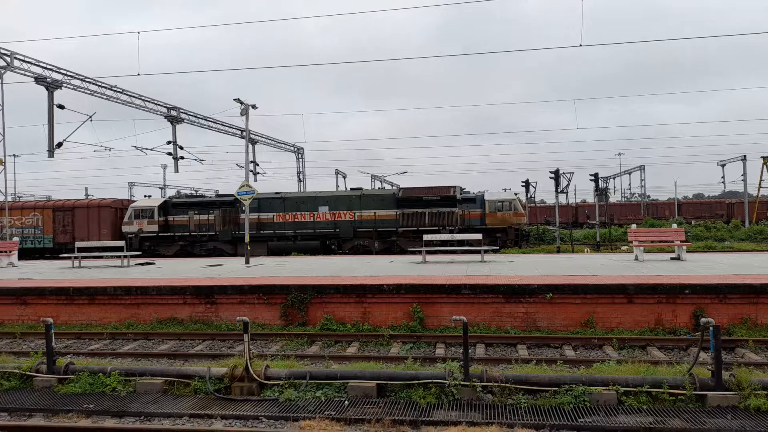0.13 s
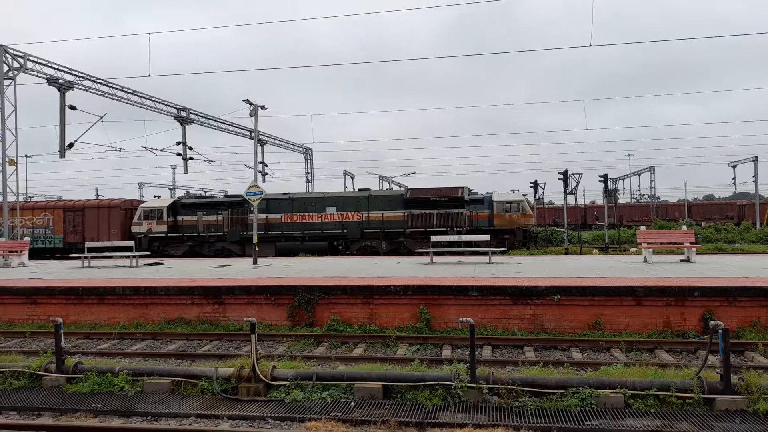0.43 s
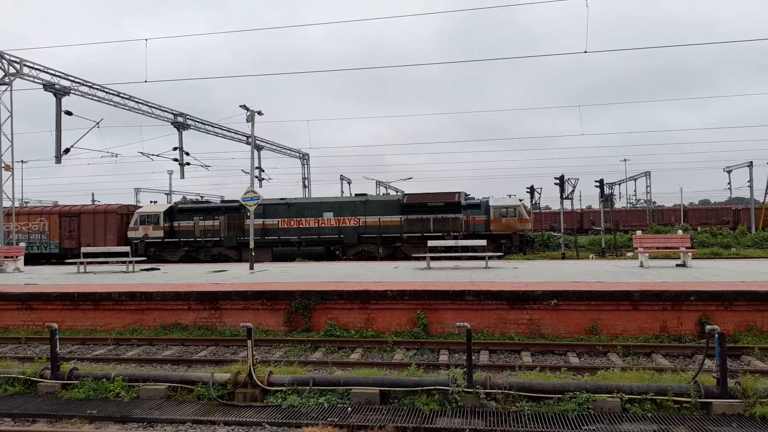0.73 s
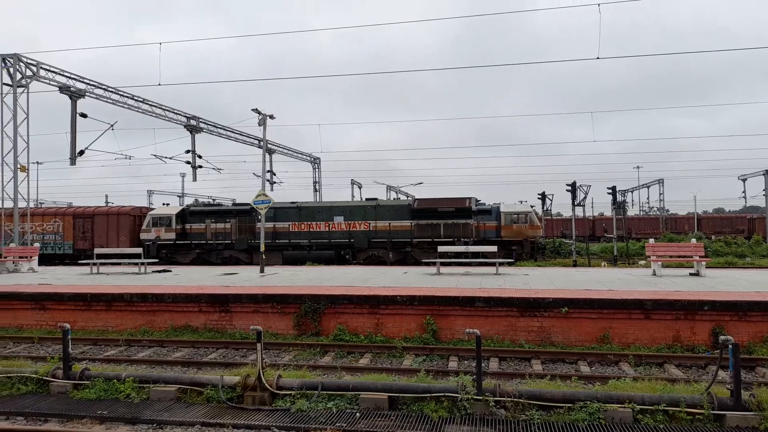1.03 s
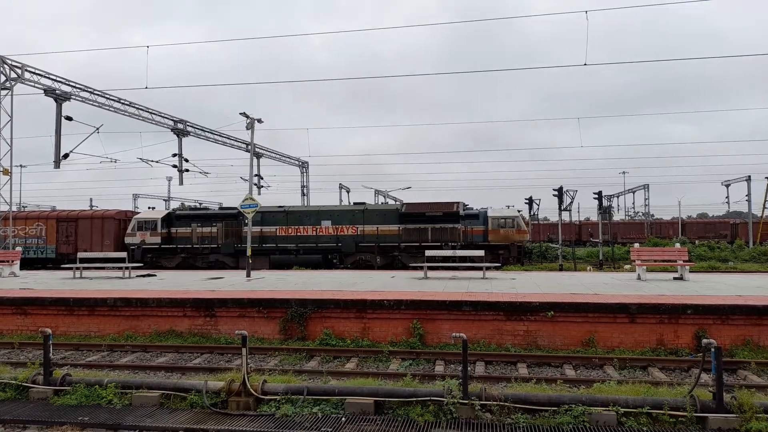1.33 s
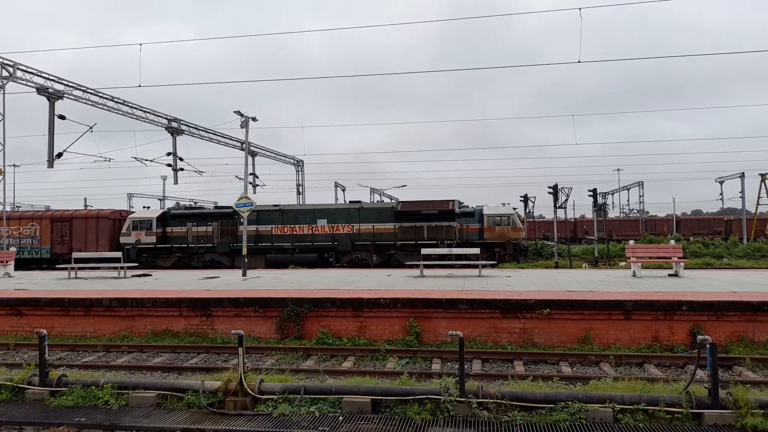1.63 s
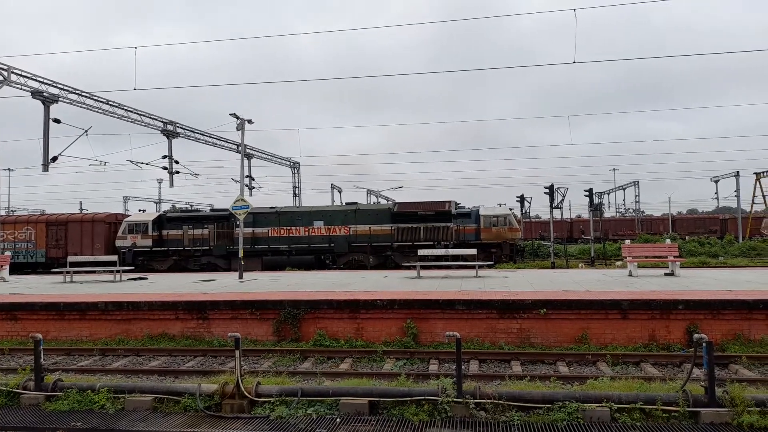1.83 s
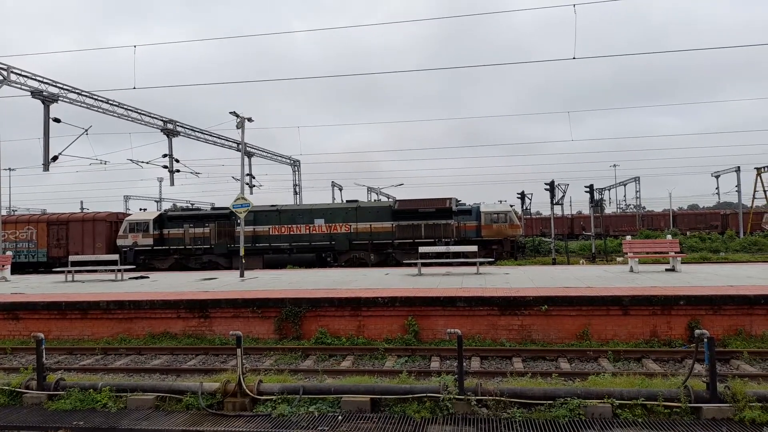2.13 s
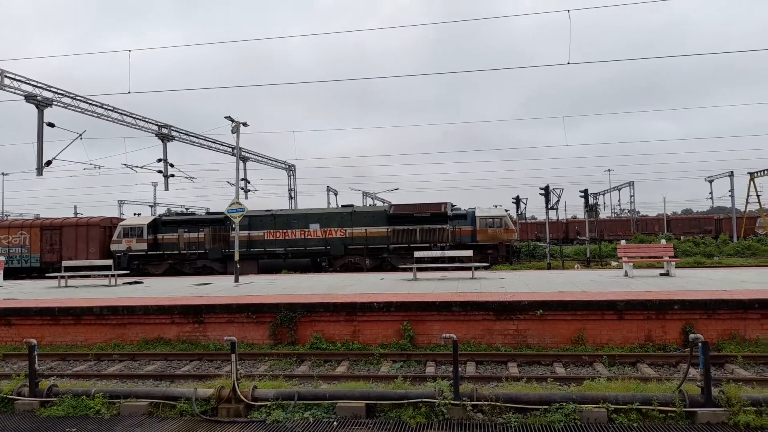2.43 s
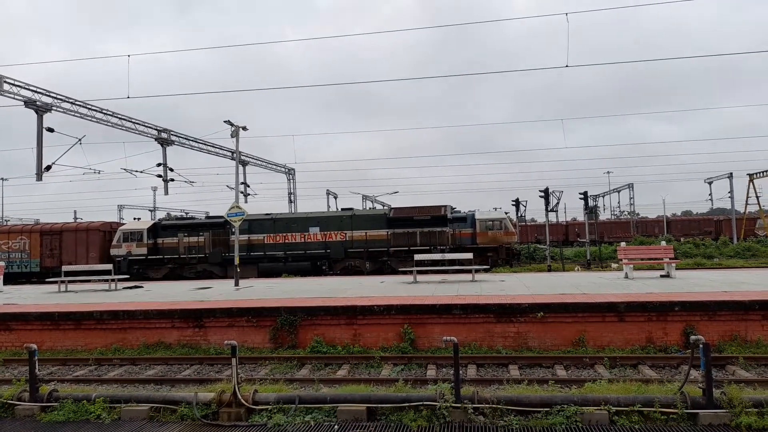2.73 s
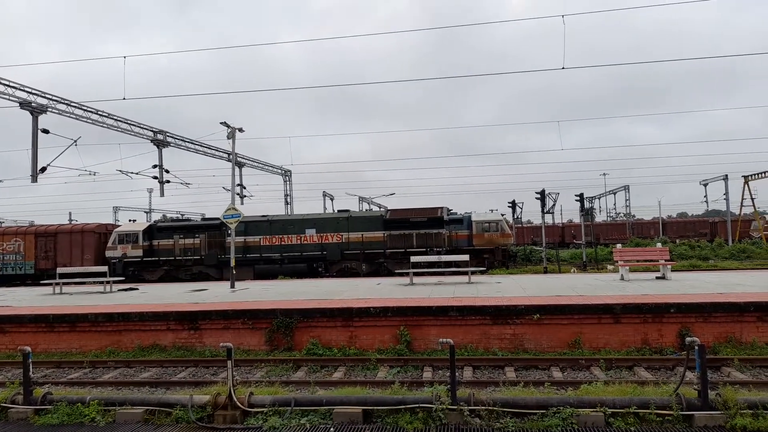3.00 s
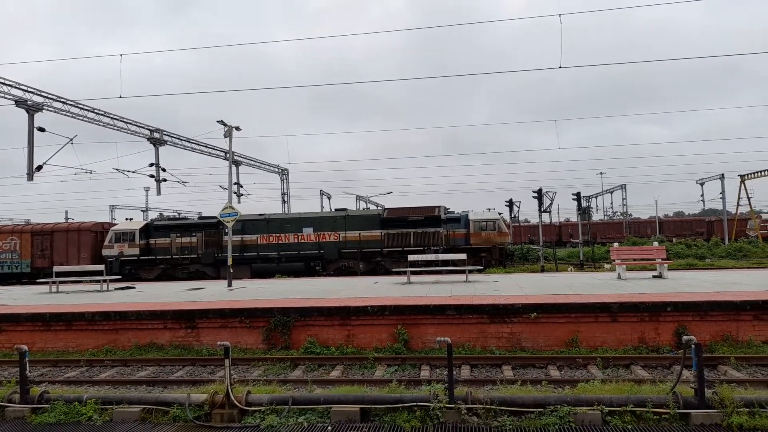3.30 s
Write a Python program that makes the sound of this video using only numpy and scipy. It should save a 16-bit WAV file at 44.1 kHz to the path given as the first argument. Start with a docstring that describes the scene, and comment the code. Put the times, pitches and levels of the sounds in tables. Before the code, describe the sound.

A diesel locomotive idles throughout, its deep, even throb mixed with mechanical clatter, rushing air and a thin, wavering whistle. It is heard from across the tracks at an open-air station, with brief distant tones near the start and end.

```python
"""Idling diesel locomotive

A big two-stroke diesel idles across the tracks of an open-air station. Each turn of its crank brings
an exhaust throb, a hollow boom and the same clatter of valves and injectors. Gas and cooling air roar,
gears whine and the turbocharger whistles. Faint rustles, ticks and distant tones come and go."""
import sys
import numpy as np
from scipy import signal
from scipy.fft import rfft, irfft
from scipy.io import wavfile

SR = 44100
rng = np.random.default_rng(int(sys.argv[2]) if len(sys.argv) > 2 else 0)


def digitize_waveform(pressure):
    """Quantize a signal to 16-bit integers and store it at the path in sys.argv[1].

    Rows of a 2-D input are taken as channels; values are limited to [-1, 1].
    """
    field = np.atleast_2d(pressure).T
    bounded = np.clip(field, -1, 1)
    quanta = np.round(bounded * 32767).astype(np.int16)
    wavfile.write(sys.argv[1], SR, quanta)


N = 152586

TURN_HZ = 6.091  # crank turns per second
RIGHT_DELAY_S = .00018  # the engine stands a little to the left


def amp(db):
    """Turns decibels into a gain."""
    return 10 ** (np.asarray(db) / 20)


def evened(x):
    """Scales a signal to an average power of 1."""
    return x / np.sqrt(np.mean(abs(x) ** 2) + 1e-30)


def read(points, hz):
    """Looks up a table between its rows, on a logarithmic pitch scale."""
    pitch, value = np.transpose(points)
    return np.interp(np.log(hz + 1), np.log(pitch + 1), value)


def clock():
    """The time of every sample, in seconds."""
    return np.arange(N) / SR


def arrival():
    """Time for the left and right ear: sound reaches the right one later."""
    return clock() - np.array([[0], [RIGHT_DELAY_S]])


def flutter(width_hz):
    """A random wobble of strength and phase; wider means faster."""
    hz = np.fft.fftfreq(N, 1 / SR)
    hiss = rng.standard_normal(N) + 1j * rng.standard_normal(N)
    return evened(np.fft.ifft(hiss / (1 + (hz / width_hz) ** 2)))


def pan(side_db):
    """Left and right gains; a positive value leans left."""
    return amp(np.array([[.5], [-.5]]) * side_db)


def stereo(left, other):
    """Blends two unrelated spectra into a left and right sound that are partly alike."""
    # how alike the two sides are (pitch [Hz], likeness [0-1])
    likeness = [(45, .99), (80, .95), (130, .84), (300, .91), (600, .83), (1200, .7), (2200, .5),
                (5000, .45), (15000, .42)]
    # which side is louder (pitch [Hz], left minus right [dB])
    balance = [(60, -6.5), (110, 1.5), (380, -2.5), (700, -2.5), (1290, -2.5), (2400, 3.5), (4000, 3),
               (5300, -2.5), (8100, 15.5), (11000, 7), (15000, 2)]
    hz = np.fft.rfftfreq(N, 1 / SR)
    same = read(likeness, hz)
    delay = np.exp(-2j * np.pi * hz * RIGHT_DELAY_S)
    right = (same * left + np.sqrt(1 - same ** 2) * other) * delay
    return evened(irfft(np.array([left, right]) * pan(read(balance, hz)), N))


def noise(colour):
    """Stereo noise, shaped by a table of pitches and levels."""
    white = rfft(rng.standard_normal((2, N)))
    return stereo(*(white * amp(read(colour, np.fft.rfftfreq(N, 1 / SR)))))


def roar():
    """Exhaust gas and cooling air rush out, puffing lightly twice per crank turn."""
    # colour of the rushing air (pitch [Hz], relative level [dB])
    colour = [(20, -76), (34, -64), (50, -42.5), (80, -55.5), (130, -58.5), (250, -54.5), (330, -58),
              (560, -66), (680, -58.5), (850, -61), (1020, -70), (1230, -68.5), (1350, -64.5),
              (1560, -69.5), (2000, -69), (2400, -70), (2850, -68), (3300, -72.5), (3900, -74.5),
              (4900, -78), (5350, -72), (5750, -82), (6700, -90.5), (8800, -95), (9800, -100),
              (12000, -96.5), (15500, -100)]
    puffs = 1 + .043 * np.cos(4 * np.pi * TURN_HZ * (clock() - .047))
    rush = amp(-27.5) * noise(colour)
    drift_db = .5 * evened(flutter(width_hz=1.9).real)
    return rush * puffs * amp(drift_db)


def clatter():
    """Valves and injectors rattle out the same pattern on every turn."""
    # colour of the rattle (pitch [Hz], relative level [dB])
    colour = [(90, -54.5), (170, -56), (300, -63), (380, -62.5), (450, -63.5), (560, -63.5), (700, -56),
              (830, -60.5), (1000, -70), (1250, -84)]
    low_hz, high_hz = 88, 1510
    multiples = np.arange(int(low_hz / TURN_HZ), int(high_hz / TURN_HZ))
    period = round(SR / TURN_HZ)
    spectrum = np.zeros((2, period // 2 + 1), complex)
    phases = np.exp(2j * np.pi * rng.random(spectrum.shape)[:, multiples])
    spectrum[:, multiples] = amp(read(colour, TURN_HZ * multiples)) * phases
    one_turn = irfft(spectrum, period)
    return amp(-29.5) * stereo(*rfft(one_turn[:, np.arange(N) % period]))


def whine(hz, db, width_hz, steady, same, side_db):
    """One machine tone, fluttering on its way through moving air."""
    left, other = flutter(width_hz), flutter(width_hz)
    right = same * left + np.sqrt(1 - same ** 2) * other
    sway = np.sqrt(steady) + np.sqrt(1 - steady) * np.array([left, right])
    return amp(db) * pan(side_db) * evened((sway * np.exp(2j * np.pi * hz * arrival())).real)


def gears_and_blower():
    """Spinning gears and the blower hum and whine, slowly easing off."""
    # their tones (pitch [Hz], level halfway through [dB], flutter width [Hz], steady share [0-1],
    # left-right likeness [0-1], left minus right [dB])
    whines = [(396, -45, 3, .9, .9, -2), (414.2, -42.5, 3, .85, .9, -3), (673, -38.5, 14, .3, .85, -2),
              (743, -43.5, 6, .7, .85, -2), (1120, -57, 3, .7, .7, 0), (1344, -42, 22, .35, .6, -1),
              (1443.6, -36.3, 15, .68, .7, 0), (2956, -47.5, 9, .3, .2, 3.8), (3144, -52.5, 22, .1, .2, 4),
              (3456, -43, 13, .3, .25, 3.2)]
    fade_db_per_s = .42
    return amp(fade_db_per_s * (clock().mean() - clock())) * sum(whine(*row) for row in whines)


def turbo():
    """The spinning turbocharger whistles, swelling and easing under a thin overtone."""
    # its tones (pitch [Hz], level before the swell [dB], then as for the gears)
    whistles = [(5340, -48, 30, .05, .35, 0), (5387, -39.8, 25, .25, .35, -.4)]
    # the whistle's swell (time [s], level change [dB])
    swell = [(.1, 1), (.55, -.5), (.8, 5.5), (1.1, -1), (1.45, 5), (1.85, -1.5), (2.25, 1), (2.55, -4.5),
             (3.0, -1.5), (3.45, -0.5)]
    whistle = amp(np.interp(clock(), *np.transpose(swell))) * sum(whine(*row) for row in whistles)
    return whistle + whine(hz=10785, db=-63.5, width_hz=128, steady=0, same=.4, side_db=-3)


def boom():
    """A hollow resonance swells once per turn, between the exhaust throbs."""
    first_s, half_s, hz = .139, .025, 250.9
    booms = np.zeros((2, N))
    for turn, random_db in enumerate(rng.standard_normal(int(N / SR * TURN_HZ) + 1)):
        t = arrival() - first_s - turn / TURN_HZ
        booms += amp(random_db) * np.exp(-(t / half_s) ** 2) * np.cos(2 * np.pi * hz * t)
    return amp(-34) * pan(side_db=1.2) * evened(booms)


def distant_tones():
    """Short, slightly blurred tones from far off; some slide down."""
    # the tones (middle [s], half length [s], pitch [Hz], slide [Hz/s], level [dB])
    tones = [(.155, 0.058, 509.7, -380, -28), (0.195, 0.066, 688, 0, -31), (.14, 0.065, 1800, 0, -39.5),
             (3.21, 0.059, 2140, -100, -38.5), (3.26, 0.03, 2500, -100, -50), (3.36, 0.037, 524, 0, -34)]
    out = np.zeros((2, N))
    for middle_s, half_s, hz, slide, db in tones:
        t = arrival() - middle_s
        blur = 1 + .29 * flutter(width_hz=60)
        tone = blur * np.exp(2j * np.pi * (hz * t + .5 * slide * t ** 2))
        out += amp(db) * evened(tone.real) * np.exp(-(t / half_s) ** 2)
    return out


def rustles():
    """Soft swells of hiss."""
    # colour of the hiss (pitch [Hz], relative level [dB])
    colour = [(500, -15), (2000, 0), (5000, 13), (8500, -7), (10000, -8), (15500, -9)]
    # the swells (middle [s], half length [s], level [dB])
    swells = [(.16, 0.15, -46), (.68, 0.018, -43), (1.55, 0.039, -41.5), (1.596, 0.032, -42.5),
              (2.296, .018, -48), (2.355, 0.027, -49), (2.93, 0.033, -48), (3.38, 0.2, -49)]
    return noise(colour) * sum(amp(db) * np.exp(-((clock() - s) / half) ** 2) for s, half, db in swells)


def exhaust():
    """Uneven firings make deep tones that peak together in one throb per turn."""
    # the deep tones (multiple of the crank rate, level [dB])
    tones = [(7, -53), (8, -27), (9, -30.5), (10, -33.5), (13, -35), (15, -44.5), (16, -48), (17, -45)]
    throb_s = .216
    turns = TURN_HZ * (arrival() - throb_s)
    throb = sum(amp(db) * np.cos(2 * np.pi * round(k) * turns) for k, db in tones)
    return pan(side_db=-.6) * np.sqrt(2) * throb


def ticks():
    """Tiny bright clicks that die away at once."""
    # the clicks (time [s], pitch [Hz], pitch spread [Hz], level [dB])
    clicks = [(1.048, 7800, 2500, -42), (1.239, 14000, 1400, -38)]
    decay_s = .004
    out = np.zeros((2, N))
    for start_s, hz, width_hz, db in clicks:
        t = arrival() - start_s
        ring = evened((flutter(width_hz) * np.exp(2j * np.pi * hz * t)).real)
        out += amp(db) * ring * (t > 0) * np.exp(-abs(t) / decay_s)
    return out


def scene():
    """The idling locomotive and the small sounds around it."""
    engine = exhaust() + boom() + clatter() + roar() + turbo() + gears_and_blower()
    return engine + rustles() + ticks() + distant_tones()


def record(dry):
    """The sound cuts in after a short silence, with its highest treble removed."""
    start_s, rise_s, top_hz = .105, .0016, 15850
    fade_in = np.clip((clock() - start_s) / rise_s, 0, 1)
    low_pass = signal.firwin(511, top_hz, window=("kaiser", 9), fs=SR)
    return signal.oaconvolve(dry * fade_in, low_pass[None], "same")


dry = scene()
out = record(dry)
digitize_waveform(out)
```